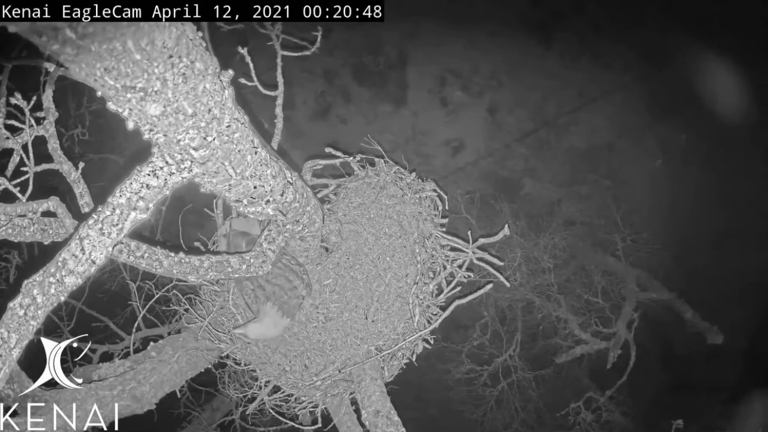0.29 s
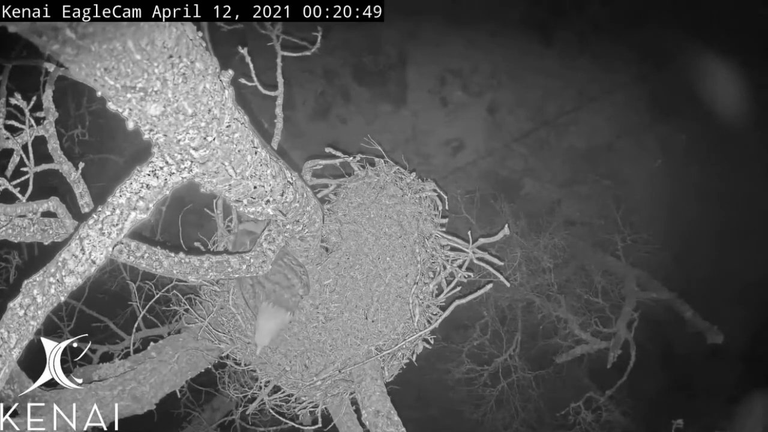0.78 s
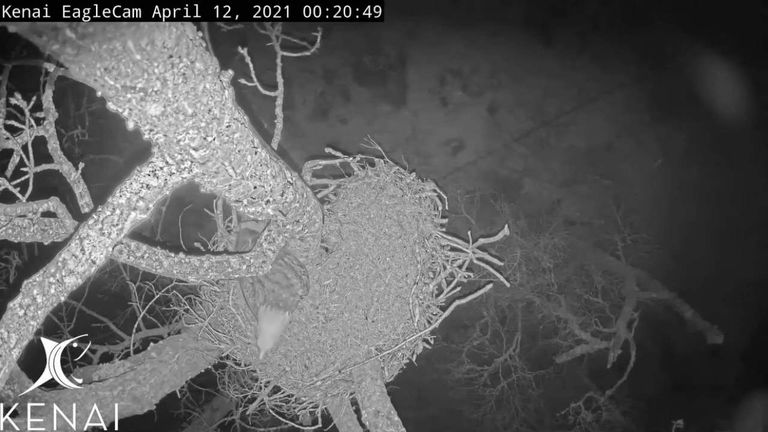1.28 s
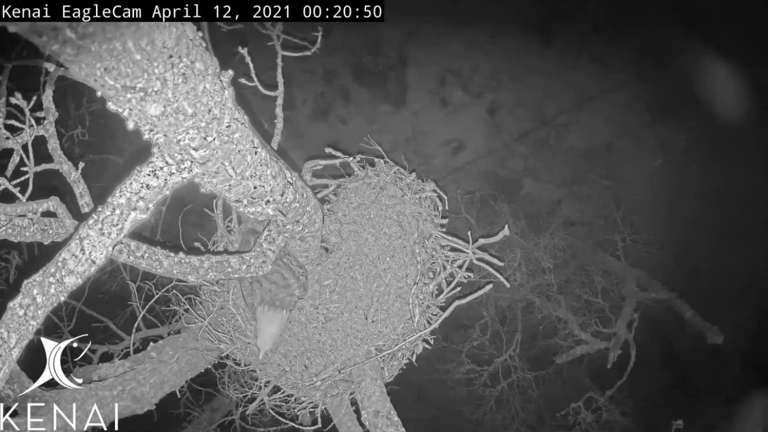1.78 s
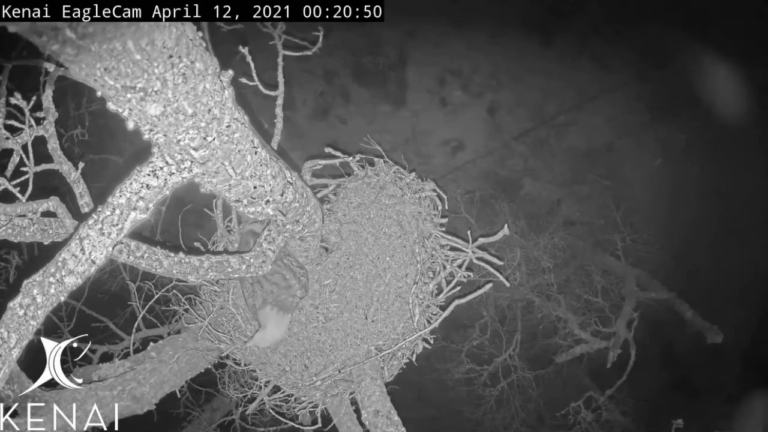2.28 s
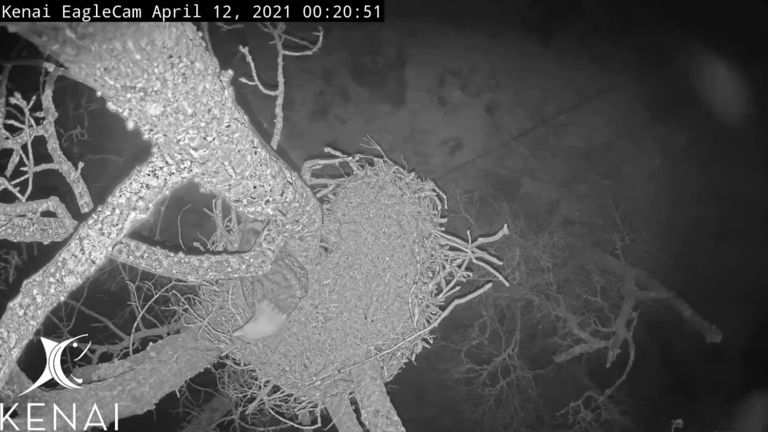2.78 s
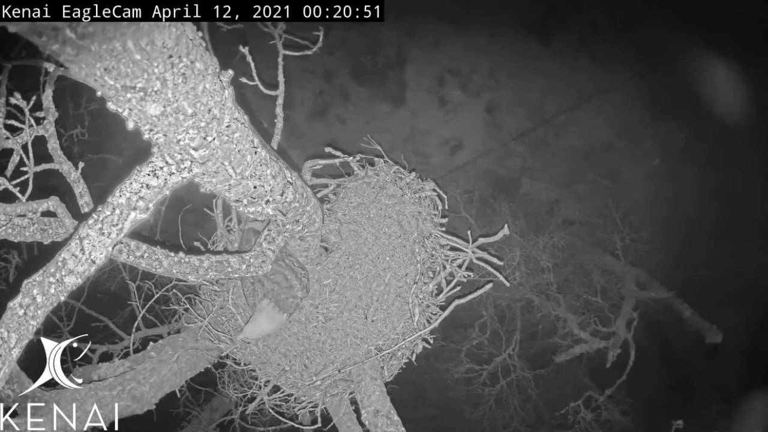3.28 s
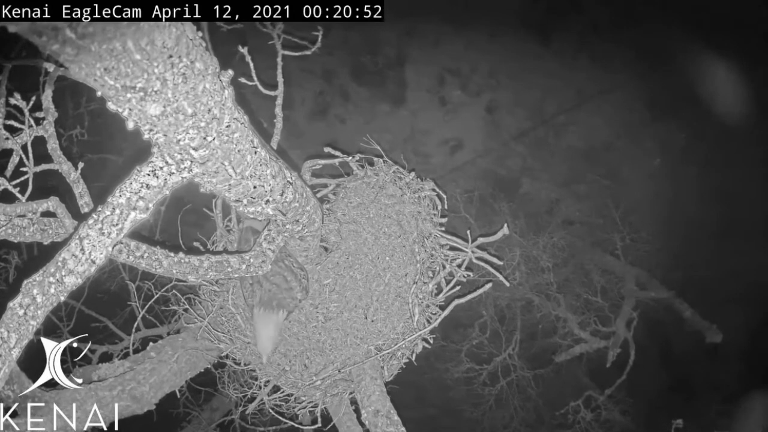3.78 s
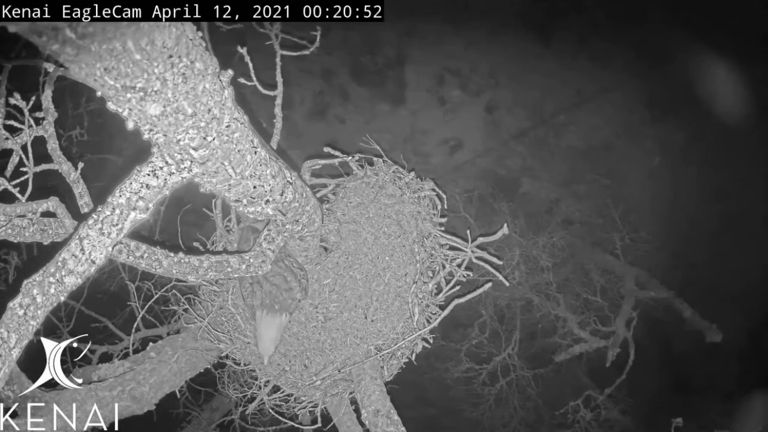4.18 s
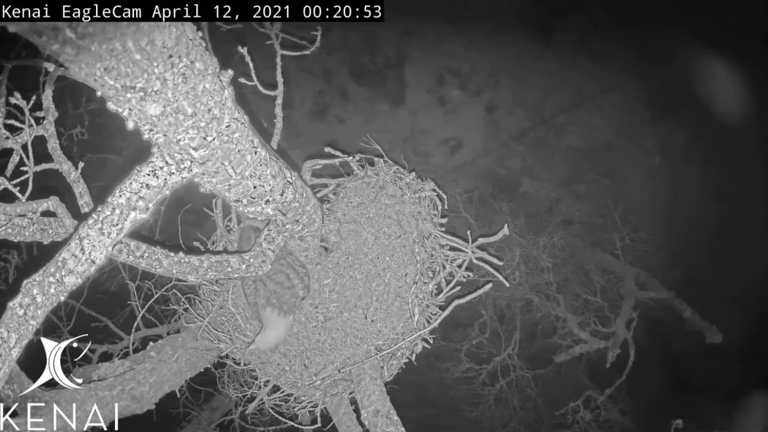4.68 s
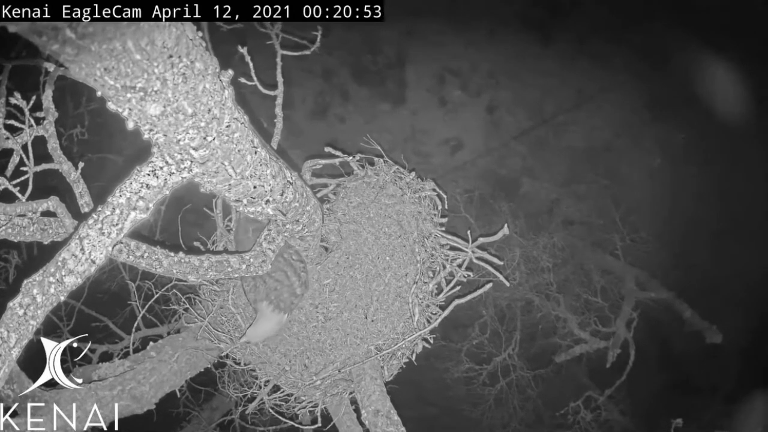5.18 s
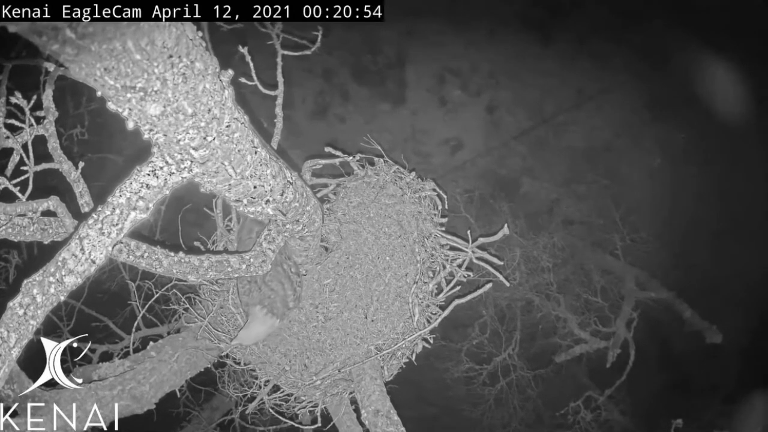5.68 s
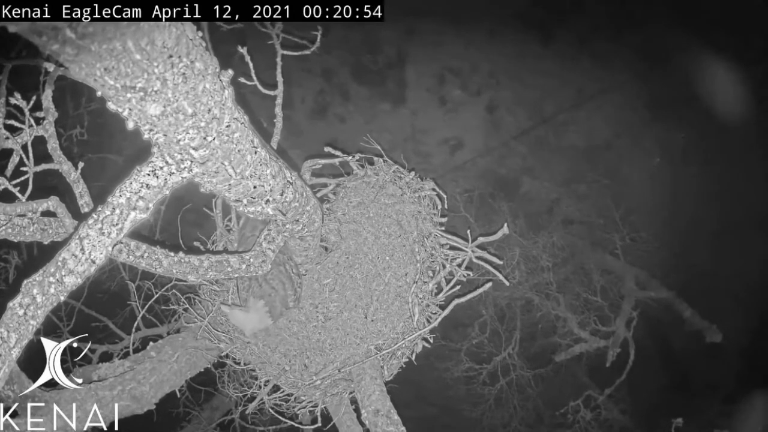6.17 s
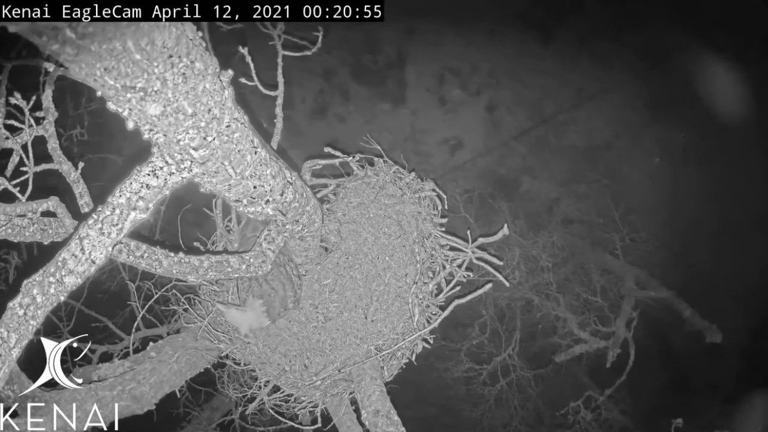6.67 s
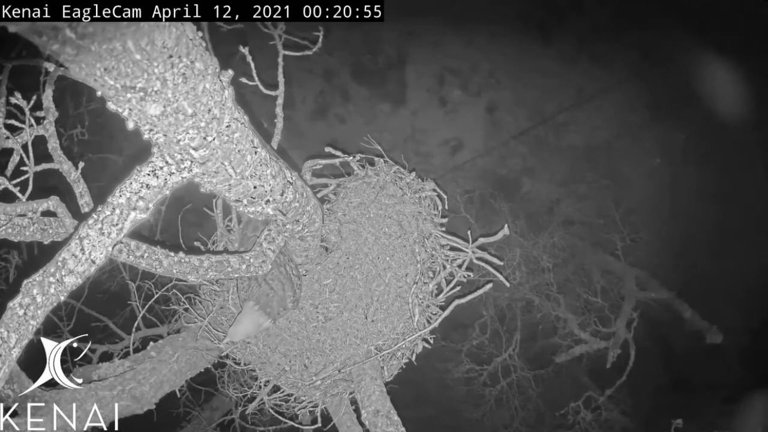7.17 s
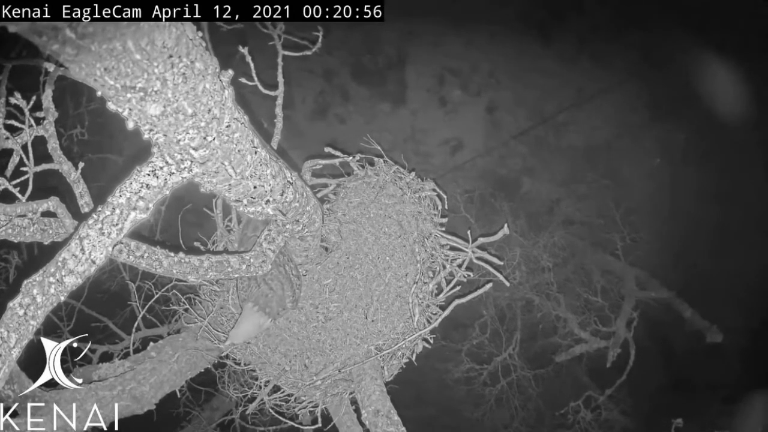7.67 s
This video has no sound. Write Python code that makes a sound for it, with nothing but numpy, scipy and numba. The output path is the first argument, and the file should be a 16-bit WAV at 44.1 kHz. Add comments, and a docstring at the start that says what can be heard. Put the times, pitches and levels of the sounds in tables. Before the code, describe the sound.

A bout of high eagle calls begins after half a second of wind: squealing whistles run down into short, bright pipes. After a sparse gap a second bout starts and continues to the end. Slight echoes come from branches and forest. Gusts thump and boom in the microphone housing, heaviest late, with soft hissing and a little crackle.

```python
"""Eagle calls in gusty wind

Eagles call in two bouts: hoarse squeals that run down into quick piping notes. Each note is an arching
whistle or a level pipe, often both together: harmonics of a moving pitch, opened by a buzzing croak.
Brief squeaks mark voice breaks; decaying noise echoes stand for branches and forest.
Gusts of wind, as shaped noise, buffet the microphone and boom in its housing over a faint steady hiss."""
import sys
import numpy as np
from scipy import signal
from scipy.fft import rfft, irfft
from scipy.io import wavfile
from scipy.ndimage import uniform_filter1d
from numba import njit

SR = 44100
rng = np.random.default_rng(int(sys.argv[2]) if len(sys.argv) > 2 else 0)


def persist_wave(psi):
    """Save psi, clipped to +-1, as 16-bit WAV."""
    counts = np.round(np.clip(psi, -1, 1) * 32767).astype(np.int16)
    wavfile.write(sys.argv[1], SR, np.atleast_2d(counts).T)


N = 347508
TIME = np.arange(N) / SR


def undb(db):
    """Logarithmic level: decibels become an amplitude gain."""
    return 10 ** (np.asarray(db) / 20)


def unit(x):
    """Power normalization: the signal is scaled to rms 1."""
    return x / np.sqrt(np.mean(x ** 2) + 1e-20)


def flutter(n, hz):
    """Band-limited random modulation: white noise low-passed at hz, with rms near 1."""
    sos = signal.butter(4, min(hz, .4 * SR), fs=SR, output="sos")
    settled = signal.sosfilt(sos, rng.standard_normal(n + SR // 20))
    return unit(settled)[-n:]


def coloured(points):
    """Spectral shaping: white noise is weighted by (frequency [Hz], level [dB]) points, then set to rms 1."""
    hz, db = np.transpose(points)
    bins = np.arange(N // 2 + 1) * SR / N
    weights = undb(np.interp(np.log(bins + 1), np.log(hz), db))
    return unit(irfft(rfft(rng.standard_normal(N)) * weights, N))


def steadied(x, seconds=0.084):
    """Envelope flattening: division by the running rms takes the slow swells out of a noise."""
    return x / np.sqrt(uniform_filter1d(x ** 2, int(seconds * SR)) + 1e-9)


def add(out, start, sound):
    """Linear superposition: a sound is mixed in at its start time [s]."""
    i = max(int(start * SR), 0)
    out[i:i + len(sound)] += sound[:N - i]


@njit
def resonate(x, hz, damping):
    """Damped resonance: a state-variable band-pass whose centre frequency moves."""
    y, low_state = np.empty(len(x)), 0.
    band_state = 0.
    for i in range(len(x)):
        g = np.tan(np.pi * hz[i] / SR)
        band = (band_state + g * (x[i] - low_state)) / (1 + g * (g + damping))
        band_state = 2 * band - band_state
        low_state = low_state + 2 * g * band
        y[i] = damping * band
    return y


def airflow(usual_wind_db=-30, unrest_db=1.0, unrest_hz=9):
    """Unsteady flow: breeze, gust swells and random unrest add in dB to a strength and a harshness."""
    # slow rise and fall of the wind on the microphone: (time [s], strength [dB])
    breeze = [(0.0, -37), (0.2, -39.5), (0.28, -31.5), (0.66, -33), (1.31, -27.5), (2.02, -31),
              (2.22, -24.5), (2.82, -28), (2.93, -37), (3.52, -31.5), (3.88, -40.2), (4.08, -31),
              (4.49, -34.5), (4.75, -27), (5.09, -34.5), (5.37, -25), (6.3, -15.5), (6.8, -24),
              (6.95, -29.5), (7.41, -30), (7.88, -21.5)]
    # single gusts on top of it: (crest time [s], length [s], rise [dB],
    # harshness: more hiss and less boom [dB])
    gusts = [(0.516, 0.18, 4.5, -3), (1.469, 0.056, 7.1, -2), (2.52, 0.43, 4.6, 0), (3.491, 0.16, 4.1, 3.5),
             (4.84, 0.34, 7.2, 3.5), (5.31, 0.15, 9.5, -2), (5.509, .15, 10.1, 0), (5.662, 0.1, 7, 0),
             (5.812, 0.075, 2.9, 0), (6.032, 0.25, 7.6, 0.5), (7.493, 0.14, 3.6, -2),
             (7.645, 0.098, 8.5, -1), (7.808, .15, 3.6, -1)]
    # strength counts from the usual wind
    strength = np.interp(TIME, *np.transpose(breeze)) - usual_wind_db + unrest_db * flutter(N, unrest_hz)
    harshness = np.zeros(N)
    for crest, length, rise_db, harsh_db in gusts:
        shape = np.cos(np.pi * np.clip((TIME - crest) / length, -.5, .5)) ** 2
        strength = strength + rise_db * shape
        harshness = harshness + harsh_db * shape
    return strength, harshness


def housing_boom(strength, harshness, boom_db=-35, boom_growth=1.076, boom_hz=152.8, hz_per_db=2.5,
                 damping=0.31, waver_db=2.0):
    """Cavity resonance: noise through two damped resonators whose hollow note climbs with the wind."""
    centre = boom_hz + hz_per_db * uniform_filter1d(strength - harshness, SR // 4)
    once = resonate(rng.standard_normal(N), centre, damping)
    boom = steadied(resonate(once, centre, damping))
    # growth: dB of boom for each dB of wind
    return boom * undb(boom_db + boom_growth * strength - harshness + waver_db * flutter(N, 12))


def slapping_puffs(puff_db=-4, puff_s=0.0073):
    """Impulsive pressure: each puff rises within about 1 ms and decays exponentially."""
    # single eddies that slap the microphone: (time [s], level before the common puff_db offset [dB])
    puffs = [(2.164, -45), (2.63, -45), (2.672, -34), (5.328, -21.5), (5.472, -21), (5.629, -21),
             (5.795, -32), (6.49, -36), (6.514, -46), (7.637, -36), (7.832, -24)]
    envelope = np.zeros(N)
    t = np.arange(SR // 10) / SR
    for start, db in puffs:
        add(envelope, start, undb(db + puff_db) * (1 - np.exp(-t / 0.001)) * np.exp(-t / puff_s))
    return envelope


def wind(buffet_db=-28.0, buffet_growth=0.93, buffet_waver_db=2.5, eddy_db=-51.5, eddy_growth=1.21,
         tearing_db=2.5, crackle_db=-18):
    """Turbulence noise: gusts shake the diaphragm, boom in the housing and shed small hissing eddies."""
    # low rumble of the diaphragm: (frequency [Hz], density [dB per Hz])
    buffet = [(10, 0), (30, 5.5), (60, -0.5), (110, -2), (170, -12.5), (250, -14), (400, -22.5), (900, -39),
              (3000, -94)]
    # hiss of the small eddies: (frequency [Hz], density [dB per Hz])
    eddies = [(150, -17.5), (300, 3.5), (500, 4), (1000, -8.5), (1500, -18), (2200, -27.5), (4000, -43),
              (8000, -49.5), (11000, -60), (15000, -74.5)]
    # crackle on the hardest pressure crests: (frequency [Hz], density [dB per Hz])
    crackle = [(400, -16.5), (1200, 7.5), (2500, -8.5), (5000, -16.5), (8500, -20.5), (11000, -39),
               (15000, -46)]
    strength, harshness = airflow()
    boom = housing_boom(strength, harshness)
    # growth: dB of sound for each dB of wind
    buffet_gain = undb(buffet_db + buffet_growth * strength + buffet_waver_db * flutter(N, 9.54))
    pressure = buffet_gain * steadied(coloured(buffet), seconds=.11) + boom
    # the air tears at each pressure crest, so the hiss comes in lumps and the biggest ones crackle
    tearing = tearing_db * np.clip(steadied(pressure), -2, 2)
    lumps = unit(undb(tearing + 1.5 * flutter(N, 40)))
    crests = unit(lumps ** 2 * undb(2.8 * flutter(N, 350)))
    flow = undb(eddy_db + eddy_growth * strength + harshness)
    hissing = coloured(eddies) * (flow * lumps + slapping_puffs())
    crackling = undb(crackle_db) * coloured(crackle) * flow * crests
    return pressure + hissing + crackling


def steady_hiss(hiss_db=-72):
    """Stationary noise: a faint hiss of fixed spectrum and level."""
    # (frequency [Hz], relative level [dB])
    hiss_spectrum = [(300, -6), (1500, 5), (4000, -1), (8700, -4.5), (10000, -9), (15500, -18.5)]
    return undb(hiss_db) * coloured(hiss_spectrum)


def buzz(slap_hz, db_at, wobble=0.053, flicker_hz=160, count=16):
    """Uneven periodic slapping of membranes: partials 2 to count - 1, each flickering by itself."""
    n = len(slap_hz)
    phase = 2 * np.pi * np.cumsum(slap_hz * (1 + wobble * flutter(n, 130))) / SR
    total = np.zeros(n)
    for k in range(2, count):
        level = undb(db_at(k * slap_hz)) * flutter(n, flicker_hz)
        total += level * np.sin(k * phase + rng.uniform(0, 2 * np.pi))
    return total


def croak(db, croak_db=-54.5, follow=0.55, length=.026, slap_hz=640, rise=.16):
    """Onset before phase locking: membranes slap in a rising buzz, more so in loud notes."""
    # partials of the croak: (frequency [Hz], relative level [dB])
    rasp_partials = [(900, -22), (1400, -5.5), (2200, 5), (3000, 3), (4400, -0.5), (5500, -9), (8000, -5.5),
                     (10000, -26), (14000, -40)]
    u = np.linspace(0, 1, int(max(length, .01) * SR))

    def db_at(hz):
        return np.interp(hz, *np.transpose(rasp_partials))

    partials = buzz(slap_hz * (1 + rise * u), db_at, wobble=.035)
    # follow: dB of croak for each dB of note
    return undb(croak_db + follow * (db + 27.5)) * np.sin(np.pi * u) ** 2 * partials


def swell(t, length, attack, release):
    """Amplitude envelope: smooth rise and fall of the air pressure in one note, times in seconds."""
    rising = np.sin(np.pi / 2 * np.clip(t / attack, 0, 1))
    falling = np.sin(np.pi / 2 * np.clip((length - t) / release, 0, 1)) ** 2
    return rising * falling


def syrinx(hz, octave_db, rough, third_db, fourth_db, jitter, stumble=1.2, rasp=1.2, rasp_ratio=.78,
           slap_hz=745, below_db=15, above_db=34):
    """Harmonic source with phase noise: roughness makes it stumble and adds broken membrane side tones."""
    n = len(hz)
    phase = 2 * np.pi * np.cumsum(hz * (1 + jitter * flutter(n, 190))) / SR
    # third and fourth harmonics are relative to the octave, and left out above half the sample rate
    third = undb(third_db) * np.sin(3 * phase) * (3 * hz < SR / 2)
    fourth = undb(fourth_db) * np.sin(4 * phase) * (4 * hz < SR / 2)
    overtones = np.sin(2 * phase) + third + fourth
    stumbling = np.sin(phase + stumble * rough * flutter(n, 400))
    fundamental = stumbling * unit(undb(6 * np.sqrt(rough) * flutter(n, 260)))
    slaps = slap_hz * rng.uniform(0.99, 1.04) * (hz / hz.mean()) ** .15

    def side_db(side_hz):
        # strongest just below the pitch, falling by below_db and above_db per octave
        octaves = np.log2(side_hz / (rasp_ratio * hz))
        return np.minimum(below_db * octaves, -above_db * octaves)

    sides = buzz(slaps, side_db, wobble=.024, flicker_hz=130)
    spurts = unit(undb(2.5 * rough * flutter(n, 130)))
    bright = undb(octave_db) * overtones * unit(undb(3.1 * flutter(n, 180)))
    return np.sqrt(2) * spurts * (fundamental + bright + rasp * rough * sides)


def whistle(length, start_hz, top_hz, end_hz, db, octave_db, rough, crest=.46, bend=1.5,
            air_db=-63, air_growth=1.76, usual_note_db=-48):
    """Pressure-driven pitch: it arches with the pressure, hoarse at start and crest; loud ones hiss with air."""
    t = np.arange(int((length + 0.0021) * SR)) / SR
    u = t / length
    rise = np.clip(1 - u / crest, 0, 1)  # 1 at the start, 0 from the crest on
    fall = np.clip((u - crest) / (1 - crest), 0, 1)  # 0 up to the crest, 1 at the end
    hz = top_hz - (top_hz - start_hz) * rise ** bend - (top_hz - end_hz) * fall ** bend
    hz = hz * (1 - 0.045 * fall ** 4)  # the pitch slips as the pressure runs out
    pressure_db = 1.8 - 4 * rise ** 2 - 7 * fall ** 2
    hoarse = rough * (1 - 0.71 * fall ** 2 - 0.38 * rise ** 2) + 0.097 * np.exp(-t / 0.0058)
    hoarse = np.clip(hoarse, 0, 1)
    bright_db = octave_db - 9 * rise ** 4 + 2 * fall  # overtones build up late and linger
    jitter = .004 + .019 * np.sqrt(np.clip(rough, 0, .4))
    voice = syrinx(hz, bright_db, hoarse, third_db=-25, fourth_db=-32, jitter=jitter)
    air_gain = undb(air_db + air_growth * (db - usual_note_db))
    air = air_gain * hoarse * rng.standard_normal(len(t))
    envelope = undb(pressure_db) * swell(t, length + 0.0042, 0.0056, 0.011)
    return envelope * (undb(db) * voice + air)


def catch(length, start_hz, end_hz, db, octave_db=-25, rough=0.023, bend=2.5):
    """Register break: the voice jumps to a brief clean squeak that holds its pitch, then slides off."""
    t = np.arange(int((length + 0.0028) * SR)) / SR
    u = t / t[-1]
    hz = start_hz + (end_hz - start_hz) * u ** bend
    voice = syrinx(hz, octave_db, np.clip(rough, 0, 1), third_db=-23, fourth_db=-30, jitter=.006)
    return undb(db + 1.1 - 3 * u ** 2) * swell(t, length + 0.0039, 0.0081, 0.011) * voice


def pipe(length, pitch_hz, db, octave_db):
    """Near-steady oscillation: a clean tone scoops up into its pitch and sags at the end."""
    t = np.arange(int((length + 0.0033) * SR)) / SR
    u = t / length
    hz = pitch_hz * (1.004 - 0.022 * u ** 4 - 0.044 * np.exp(-t / 0.0032))
    hoarse = np.clip(0.0064 + 0.13 * np.exp(-t / 0.0028), 0, 1)
    bright_db = octave_db - 12 * np.exp(-t / 0.0098)  # overtones build up late
    voice = syrinx(hz, bright_db, hoarse, third_db=-12, fourth_db=-33, jitter=.004)
    return undb(db + 0.5 - 1.8 * u ** 2) * swell(t, length + 0.0019, 0.014, 0.014) * voice


def scatter(t60):
    """Diffuse reverberation: noise builds up softly and decays by 60 dB in t60 seconds."""
    t = np.arange(SR) / SR
    decay = undb(-60 * t / t60) * (1 - np.exp(-t / 0.0087))
    return unit(rng.standard_normal(SR) * decay) / np.sqrt(SR)


def forest(x, near_db=-4.5, near_t60=0.095, far_db=-20, far_t60=0.62):
    """Convolution with echoes: a quick scatter from the crown and a faint tail from the trees around."""
    crown, trees = scatter(near_t60), scatter(far_t60)
    # twigs scatter short waves best
    crown = signal.sosfilt(signal.butter(1, 4500, "high", fs=SR, output="sos"), crown)
    response = undb(near_db) * crown + undb(far_db) * trees
    response[0] = 1  # direct sound
    return signal.fftconvolve(x, response)[:N]


def scene(lead=0.0067, dull_hz=10500):
    """Superposition of sources: the birds among the trees, the wind and a faint steady hiss."""
    # arching notes: (time [s], length [s], start pitch [Hz], top pitch [Hz], end pitch [Hz],
    # level [dB], octave level re fundamental [dB], roughness [0-1])
    whistles = [(0.568, 0.095, 4430, 5870, 5300, -41, -9, 0.22),
                (0.669, 0.1, 6250, 6620, 4850, -43.5, -17, 0.34),
                (0.767, 0.083, 6540, 6470, 4820, -46.5, -12, 0.44),
                (0.895, 0.068, 4420, 5190, 4050, -49.5, -2.5, 0.53),
                (1.026, 0.055, 3880, 4520, 3840, -45.5, -7.5, 0.1),
                (1.157, 0.056, 4150, 4400, 3400, -49, -12, 0.08),
                (1.298, 0.039, 3680, 3886, 3640, -45.5, -9, 0.05),
                (1.438, 0.037, 3640, 3590, 3370, -47.5, -6.5, 0.08),
                (1.637, 0.031, 4060.0, 4320, 4020, -48.5, -3.5, 0.07),
                (2.229, 0.05, 3700, 4100, 3880, -48.5, -4, 0.1),
                (2.465, 0.044, 3610, 3790, 3720, -50.5, 5, 0.12),
                (2.743, 0.038, 3420, 3460, 3350, -50.5, -1.5, 0.18),
                (3.232, 0.034, 1100, 1180, 1250, -49, -3, 0.04),
                (4.062, 0.054, 3700, 3630, 3550, -60.5, -3.5, 0),
                (4.136, 0.087, 3650, 5720, 4740, -52, 1, 0.48),
                (4.234, 0.091, 4900, 6130, 4450, -54.5, -7, 0.73),
                (4.306, 0.031, 4340, 4200, 4260, -54, -2.5, 0.1),
                (4.342, 0.073, 4530, 5490, 3830, -53.5, -2.5, 0.67),
                (4.451, 0.071, 3950, 4830, 3730, -48.5, -3.5, 0.28),
                (4.581, 0.041, 3560, 3726, 3610, -30, -20, 0.01),
                (4.688, 0.062, 4060, 4310, 3530, -49, -5, 0.42),
                (4.812, 0.045, 3540, 3690, 3250, -49, 0.5, 0.19),
                (5.429, 0.069, 3780, 4510, 3990, -47.5, -3, 0.22),
                (5.554, 0.055, 3270, 4015, 3680, -49.5, 5, 0.1),
                (5.701, 0.05, 3440, 3900, 3420, -51, 6.5, 0.13),
                (5.835, 0.045, 3560, 3800, 3320, -49, 5, 0.07),
                (6.145, 0.055, 3620, 3683, 3610, -29.5, -8.5, 0.04),
                (6.252, 0.055, 3620, 4130.0, 3440, -42, -1.5, 0.08),
                (6.525, 0.05, 2990, 3660, 3480, -46.5, 3.5, 0.14),
                (6.638, 0.067, 3960, 4560, 3580, -43, -3, 0.23),
                (7.029, 0.093, 4050, 5040, 3330, -48.5, -3.5, 0.3),
                (7.158, 0.059, 3615, 3773, 3630, -29, -14, 0.01),
                (7.288, 0.048, 3550, 3676, 3610, -29.5, -15, 0),
                (7.42, 0.045, 4080, 4240, 3580, -45, 0.5, 0.23),
                (7.576, 0.045, 3460, 3855, 3340, -48, 3, 0.02),
                (7.741, 0.034, 3330, 3560, 3080, -48, -2, 0.02)]
    # squeaks where the voice breaks: (time [s], length [s], start pitch [Hz], end pitch [Hz], level [dB])
    catches = [(0.667, 0.023, 6420, 5500, -29.5), (0.733, 0.023, 4500, 3930, -42),
               (0.783, 0.011, 5980, 5450, -28.5), (0.83, 0.011, 5700, 5230, -32.5),
               (0.835, 0.018, 3900, 3380, -45.5), (4.23, 0.019, 4700, 5030, -40.5),
               (4.563, 0.036, 4260, 4750, -50), (6.129, 0.02, 4370, 4520, -46.5),
               (7.139, 0.021, 4350, 5240, -50), (7.278, 0.023, 4500, 4300, -50)]
    # level notes: (time [s], length [s], pitch [Hz], level [dB], octave level re fundamental [dB])
    pipes = [(0.903, 0.015, 3054, -39.5, -25), (1.167, 0.017, 3047, -25.5, -15),
             (1.179, 0.023, 3020, -49.5, 9.5), (1.295, 0.014, 2980, -44, -26),
             (1.432, 0.018, 2840, -47, -27.5), (1.628, 0.019, 2938, -26.5, -10.5),
             (1.644, .014, 2913, -36, 4.5), (1.829, 0.035, 2824, -32, -15.5),
             (1.987, 0.032, 2833, -30.5, -12.5), (2.733, 0.044, 1320, -56, -6),
             (4.577, 0.016, 3040, -33, -13), (4.692, 0.016, 2995, -34.5, -11),
             (4.966, 0.034, 2911, -28, -9), (5.097, 0.031, 2800, -35, -8.5),
             (5.426, 0.016, 2970, -44, -7.5), (6.139, 0.017, 2984, -29, -12),
             (6.515, 0.018, 2614, -38, -16), (6.644, 0.015, 2896, -32, -11), (7.037, 0.017, 3030, -47, -16),
             (7.277, 0.022, 2960, -48, -7), (7.414, 0.026, 2940, -40.5, -9), (7.569, .016, 2800, -52, -8),
             (7.734, 0.014, 2790, -45, -6)]
    birds = np.zeros(N)
    # each croak starts lead seconds ahead of its note
    for start, *note in whistles:
        add(birds, start, whistle(*note))
        if note[2] > 2000:  # the one low, relaxed note starts without a croak
            add(birds, start - lead, croak(db=note[4]))
    for start, *note in catches:
        add(birds, start, catch(*note))
        add(birds, start - lead, croak(db=note[3]))
    for start, *note in pipes:
        add(birds, start, pipe(*note))
        add(birds, start - lead, croak(db=note[2]))
    # the highest overtones of the calls are dulled on their way through air and leaves
    birds = signal.sosfilt(signal.butter(2, min(dull_hz, .45 * SR), fs=SR, output="sos"), birds)
    return (forest(birds) + wind() + steady_hiss())[None]


def record(dry, ceiling=1.0, top_hz=15800):
    """Soft saturation and band-limiting: the strongest buffets are rounded and the top is cut."""
    rounded = ceiling * np.tanh(dry / ceiling)
    return signal.sosfilt(signal.ellip(8, .2, 70, top_hz, fs=SR, output="sos"), rounded)


dry = scene()
out = record(dry)
persist_wave(out)
```